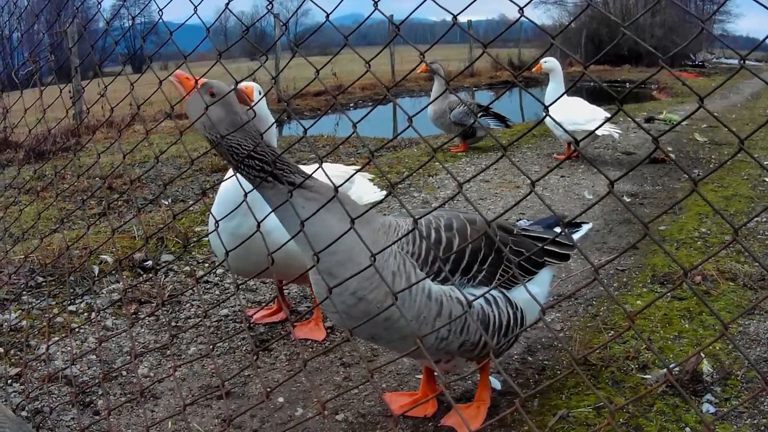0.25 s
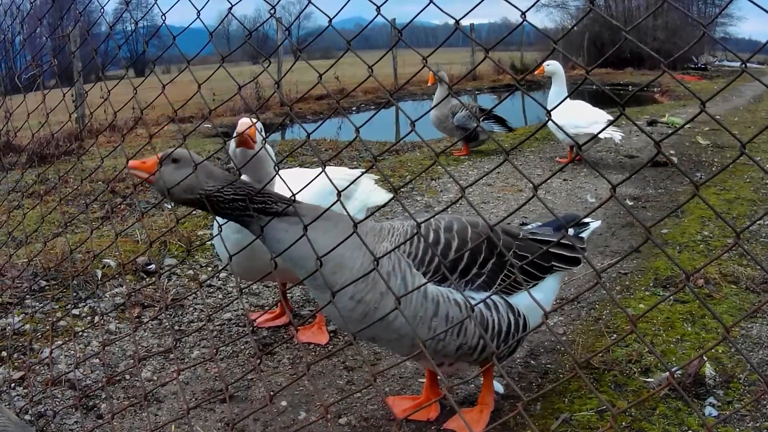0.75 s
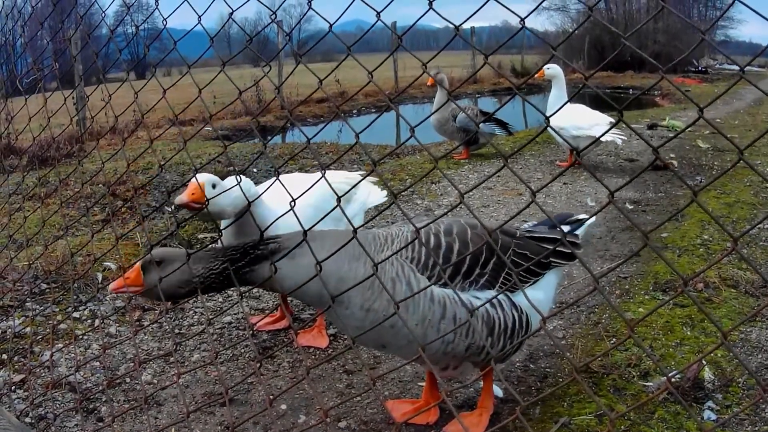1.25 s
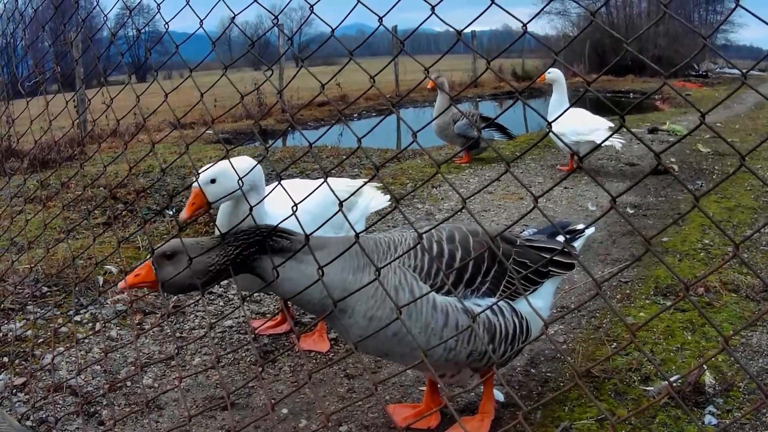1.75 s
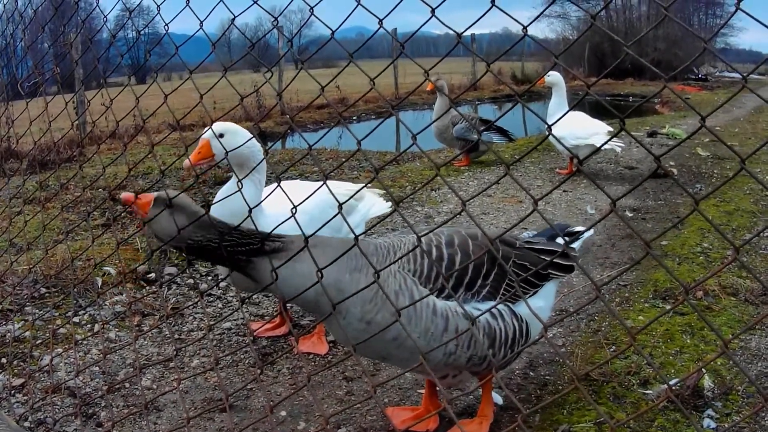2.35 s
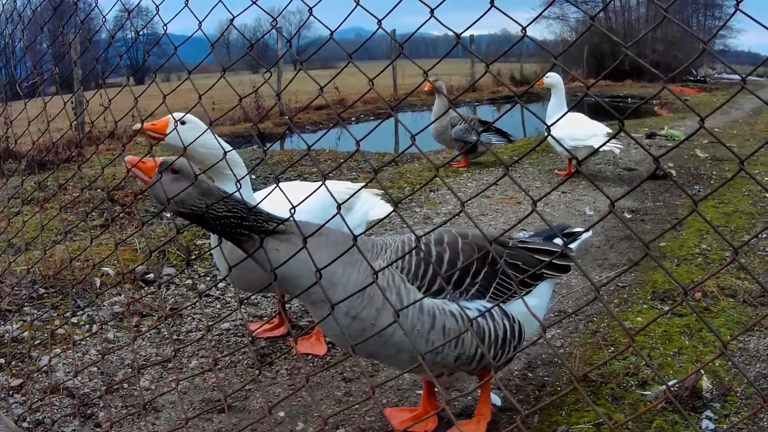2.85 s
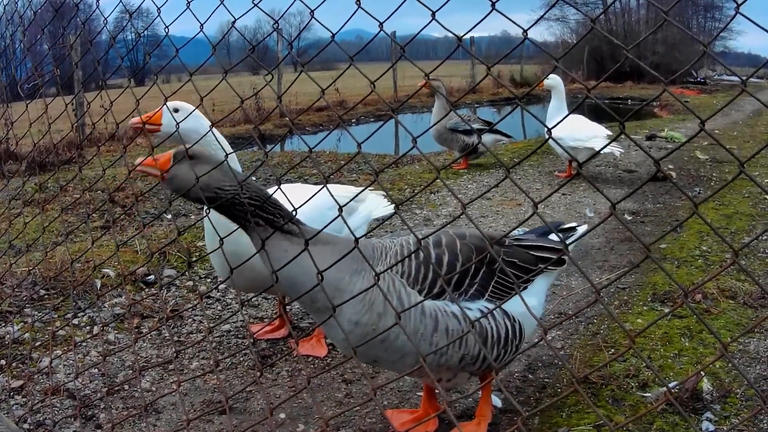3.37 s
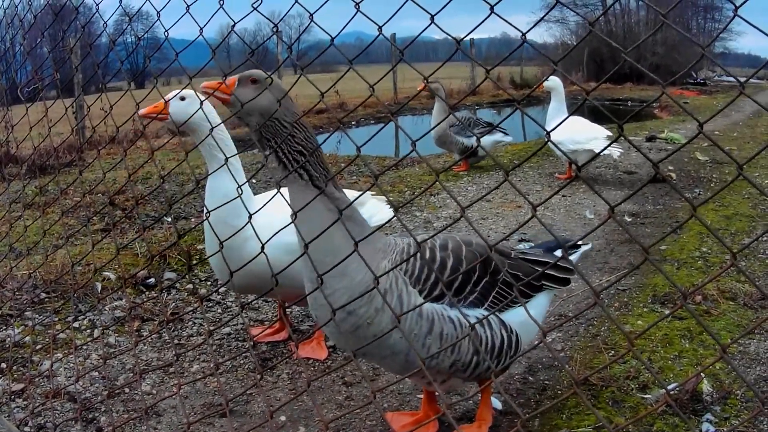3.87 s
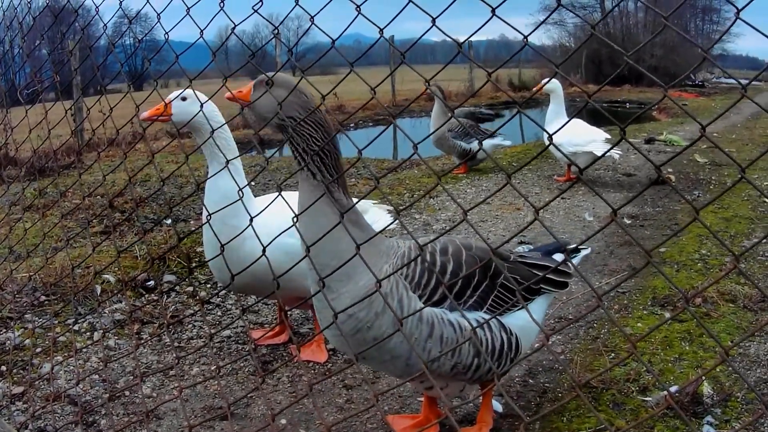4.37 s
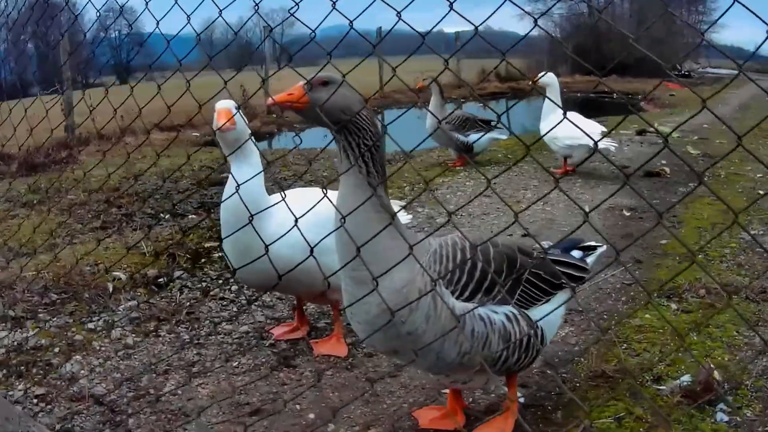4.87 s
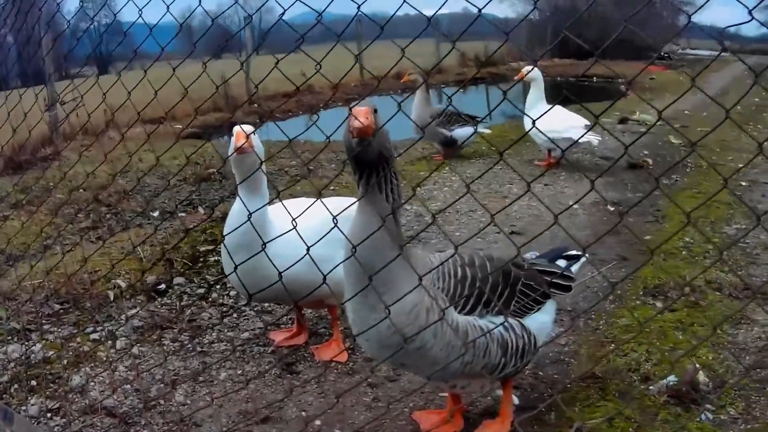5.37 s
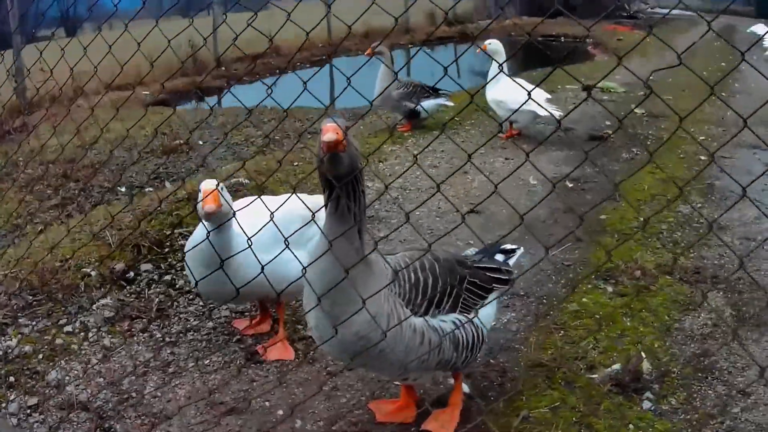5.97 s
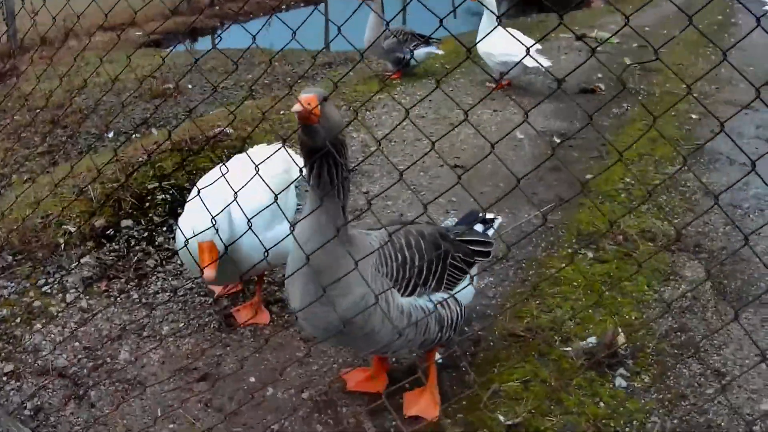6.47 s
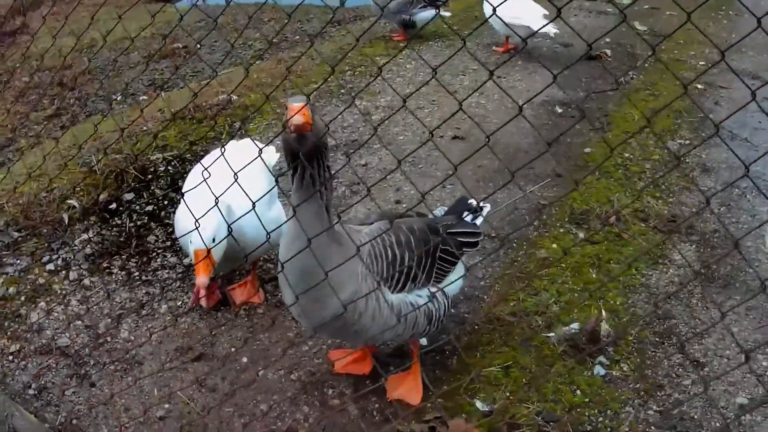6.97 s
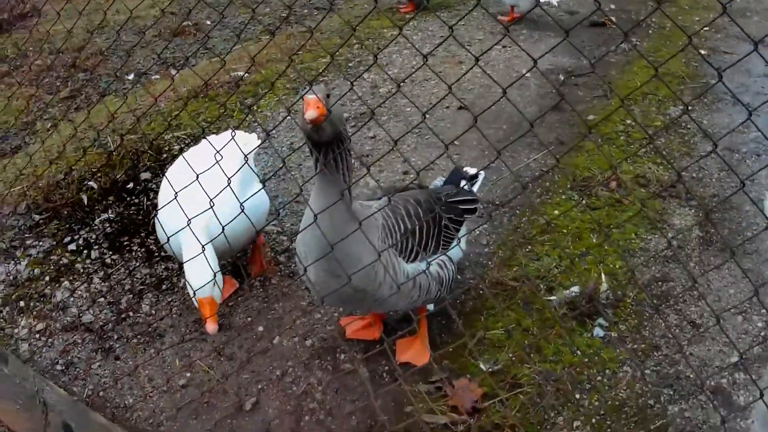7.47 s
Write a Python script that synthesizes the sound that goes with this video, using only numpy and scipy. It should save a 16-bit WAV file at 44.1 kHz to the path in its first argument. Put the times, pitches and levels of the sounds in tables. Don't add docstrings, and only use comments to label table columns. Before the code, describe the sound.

Outdoors in an open yard, geese call very close to a hand-held stereo microphone. From about 0.1 to 1.2 s one cackles in rapid, rough, nasal syllables, about ten a second, in short breaths and rising slightly. A short sharp honk at 1.3 s is surrounded by a mate's low, closed-beak grunts, softening until 1.7 s. After a tiny click at 2.0, a brief honk at 2.2 and a faint falling whistle at 2.4, hoarser chatter runs from 2.5 to 3.5 s. The loudest moment follows: a full brassy honk at 3.65 and a lower answer at 3.9. A small high yelp comes at 4.16. Then it is quiet: faint distant rattles between 4.5 and 6.7, stone ticks at 4.7, 4.9 and 5.4, a sharper snap at 5.9, gravel scuffs and wind bumps near 5.7-6.3. Dull, distant grunts recur from 6.9 to the end at 7.7, with two ticks around 7.1. Hiss rises and falls with calls.

```python
import sys
import numpy as np
from scipy import signal
from scipy.fft import rfft, irfft
from scipy.io import wavfile
from scipy.ndimage import uniform_filter1d

SR = 44100
rng = np.random.default_rng(int(sys.argv[2]) if len(sys.argv) > 2 else 0)


def how_loud(loudness_db):
    steps = np.asarray(loudness_db, float) / 20
    return 10 ** steps


def store_wav(level_fs):
    pcm = np.round(np.clip(np.atleast_2d(level_fs), -1, 1) * 32767)
    wavfile.write(sys.argv[1], SR, pcm.T.astype(np.int16))


N = 340452

# (start [s], beak level [dB], pitch [Hz], windpipe level [dB], upper throat level [dB])
CACKLE = [(.054, -56, 145, -50, -59), (.088,), (.122, -25.5, 156, -33, -43), (.222, -28, 151, -29.5, -40),
          (.316,), (.332, -26, 156, -33, -41), (.418, -23, 158, -30, -38), (.508, -25, 157, -29, -40),
          (.622, -22, 167, -30, -34), (.712, -21, 172, -28, -33), (.815, -23, 172, -29, -34),
          (.92, -26, 170, -26, -33), (1.04,), (1.08, -26, 177, -28, -32), (1.178,)]
CHATTER = [(2.464, -39, 158, -35, -41), (2.535, -34, 171, -29, -43), (2.598,), (2.653, -24, 168, -28, -37),
           (2.755, -29, 162, -29, -38), (2.858, -24, 162, -29, -34), (2.962, -28, 168, -29, -35),
           (2.992, -24, 184, -28, -31), (3.072, -29, 164, -30, -35), (3.158,), (3.176, -25, 185, -29, -28),
           (3.298,), (3.326, -24, 170, -24, -33), (3.42, -32, 178, -28, -35), (3.47, -27, 165, -26, -33),
           (3.546,)]
HONKS = [
    (1.298, -19, 175, -31, -34),
    (1.342,),
    (2.174, -39, 200, -55, -41),
    (2.192, -30, 172, -32, -44),
    (2.222,),
]
YELP = [
    (4.162, -31, 241, -28, -44),
    (4.197,),
]
# (time [s], beak level [dB], pitch [Hz])
BLASTS = [
    [(3.645, -42, 183.4), (3.657, -16, 186.0), (3.664, -10, 186.2), (3.695, -16, 183.0),
     (3.72, -15.5, 183.2), (3.749, -11, 184.2), (3.8, -11, 182.2), (3.829, -22, 174.9), (3.865, -41, 176.0)],
    [(3.872, -42, 170.0), (3.884, -28, 176.0), (3.904, -27, 178.6), (3.914, -14, 180.4),
     (3.922, -12, 180.5), (3.994, -18, 173.3), (4.006, -20, 172.0), (4.038, -41, 168.0)],
]
# (roughness [0-1], beak resonance [Hz])
CACKLE_COLOUR = (.58, 1170)
CHATTER_COLOUR = (.75, 1170)
HONK_COLOUR = (.65, 1090)
YELP_COLOUR = (.4, 1020)
BLAST_COLOUR = (.2, 1125)
# (centre [Hz], width [Hz], level [dB])
WINDPIPE = [(539.3, 285, 6.5), (759.4, 434, 11)]
CACKLE_UPPER = [(1640, 220, -2), (1951, 190, 6), (2320, 200, 0.5), (2939, 610, -11), (3579, 190, -12.5),
                (4130, 580, -23), (5840, 1600, -42.5)]
HONK_UPPER = [(1580, 390, -7), (2330, 220, 4.5), (2797, 313, -6), (3360, 220, -20.5), (3970, 240, -16),
              (5080, 460, -27), (6405, 700, -36)]
# (centre [Hz], width [Hz], level under the windpipe [dB])
MATE_CHEST = [(127, 13, -16.5), (256.3, 180, -15.5)]
# (start [s], length [s], level [dB], pitch [Hz])
GRUNTS = [
    (1.19, .085, -34.5, 126),
    (1.39, .11, -39.5, 125),
    (1.616, .095, -44, 119.9),
    (6.929, .095, -46.5, 120.7),
    (7.19, .115, -49.5, 124.3),
    (7.457, .13, -49.5, 126),
    (7.701, .03, -59.5, 123),
]
# (frequency [Hz], level [dB])
GRUNT_NEAR = [(90, -11.5), (125, -4.5), (260, -5), (360, -12.5), (500, -4), (660, 4), (900, -12),
              (1500, -10), (2400, -19), (3500, -41), (6000, -66)]
GRUNT_AWAY = [(90, -10), (125, 12.5), (250, 8.5), (370, 4), (500, 7), (1020, 14), (1250, 3), (1550, 3.5),
              (1900, -21), (3500, -42.5)]
# (start [s], length [s], upper band level [dB], lower band relative [dB])
FAR = [
    (4.459, .17, -59, -36),
    (5.112, .07, -68, -18),
    (5.278, 0.11, -68, -10.5),
    (5.873, .08, -53, 1.5),
    (6.147, .09, -54.5, -1),
    (6.383, .09, -58, 2.5),
    (6.634, .08, -60, 5),
]
# (centre [Hz], width [Hz])
FAR_BANDS = [(1079, 140), (568, 148)]
# (time [s], pitch [Hz], level [dB])
PEEP = [
    (2.37, 820, -74.5),
    (2.42, 653, -41.5),
    (2.45, 650, -72),
]
# (time [s], peak level [dB], low ring [Hz], high ring relative [dB], t60 [s])
TICKS = [
    (4.741, -48, 804, -11.5, 0.093),
    (4.94, -42, 1120, -18, 0.027),
    (5.386, -40.5, 290, -21, 0.085),
    (5.387, -38.5, 696, -15.5, .05),
    (7.068, -40.5, 636, -10.5, 0.026),
    (7.115, -47, 316, -22, 0.026),
]
SNAP = [
    (2.002, -54, 3330, -41.5, .008),
    (5.69, -65, 325, 3, 0.048),
    (5.766, -52.5, 380, 2, 0.059),
    (5.934, -33.5, 590, -9.5, 0.049),
    (6.059, -63.5, 271, 7.5, 0.015),
]
# (time [s], level [dB])
SCUFF = [
    [(5.66, -100.5), (5.768, -65.5), (6.6, -97)],
    [(6.91, -83), (6.955, -60.5), (7.16, -77)],
]
# (time [s], level [dB])
GUSTS = [(0.0, -70), (0.36, -56), (1.7, -61), (1.83, -76.5), (2.66, -60.5), (5.29, -57), (5.63, -46.5),
         (6.23, -46), (6.53, -56.5), (7.42, -57), (7.5, -46), (7.72, -59)]
# (time [s], level [dB])
YARD_WASH = [
    [(0.0, -68.5), (0.11, -58), (0.14, -57.5)],
    [(4.1, -57), (4.25, -66), (5.16, -77.5), (7.28, -72), (7.72, -72.5)],
]
# (frequency [Hz], level [dB])
WIND = [(8.8, -29), (15, 3.5), (40, -4.5), (85, -13), (136, -28.5), (220, -38.5), (290, -65.5), (480, -120)]
WASH = [(150, 3), (330, -11.5), (560, -7), (900, -9), (1200, -2), (1550, -20.5), (2100, -13.5),
        (3000, -26.5), (6000, -39)]
GRIT = [(1000, -17), (1600, -7), (2000, 0.5), (2600, -16), (4000, -26), (7000, -27.5)]
HISS = [(200, -25.5), (3000, -17), (5500, -16), (7200, -24), (8200, -10.5), (9300, -1), (10500, -6),
        (11800, -16), (12600, -31.5), (14000, -40.5)]
# (frequency [Hz], t60 [s])
YARD = [(150, 0.15), (600, 0.26), (1200, 0.3), (3000, 0.35), (7000, 0.13)]
# (frequency [Hz], phase [rad])
LEAD = [(60, .2), (200, .6), (400, .35), (700, -.25), (1500, -.2), (3900, 0)]
# (frequency [Hz], level [dB])
LEAN = [(60, 0), (95, -1), (150, -0.5), (240, 1.5), (380, 2), (590, 0.5), (940, 1), (1480, 0.5),
        (2350, 0.5), (3710, 2)]
# (from [s], to [s])
DROPOUTS = [(1.285, 1.34), (2.465, 2.49), (2.655, 2.678), (3.325, 3.345), (3.645, 3.668), (4.165, 4.185)]

RISE_S, FALL_S, EDGE_DB = 0.013, 0.017, 25.5
BEAK_ARCH_DB, UPPER_ARCH_DB, PIPE_ARCH_DB, PITCH_ARCH, CREST = 12, 4.5, 3, .072, .52
SLUR_S = .011
TONGUE_DB = 3
CHEST_DB, YELP_CHEST_DB = -7.5, -30
BLAST_PIPE_DB, BLAST_UPPER_DB, BLAST_CHEST_DB = -25, -14, -12.5
MATE_HZ, GRUNT_ARCH_DB = 121.7, 5
FAR_PER_S, FAR_ARCH_DB = 97, 8
TICK_HZ, SNAP_HZ = 1540, 2180
YARD_DB, FAR_YARD_DB, SCATTER_DB = -20, -12.5, -13
GATE_SHUT_DB, GATE_OPEN_DB, HISS_DB, GATE_DEPTH_DB = -83.5, -51.5, -62.5, 36


def goose(shape, colour, upper, mate):
    beak_db, hz, pipe_db, upper_db, chest_db = shape
    rough, beak_hz = colour
    count, bend = len(hz), hz / hz.mean()
    slack_db = np.minimum(beak_db.max() - beak_db, 14)
    drive, turns = syrinx(hz, .75 * rough + .012 * slack_db, jitter=.02)

    gabble = syrinx(MATE_HZ + 0 * hz, .4 + 0 * hz, jitter=0.17, top_hz=1500)[0]
    crowd = mate * how_loud(np.minimum(pipe_db, 6))
    pipe = 0
    for k, (f, width, db) in enumerate(WINDPIPE):
        pipe = pipe + (-1) ** k * how_loud(db) * steep(drive + crowd * gabble, f, width)
    mate_chest = sum(how_loud(db) * evened(resonate(gabble, f, width)) for f, width, db in MATE_CHEST)
    pipe = evened(pipe, size=700) + np.minimum(crowd, .4) * mate_chest

    raspy = drive + (.22 + .7 * rough) * rush(count)
    throat = 0
    for k, (f, width, db) in enumerate(upper):
        tongue_db = TONGUE_DB * evened(uniform_filter1d(rush(count), size=2200))
        throat = throat + (-1) ** k * how_loud(db + tongue_db) * resonate(raspy, f * bend ** 0.71, width)

    chest = np.sqrt(2) * np.cos(2 * np.pi * turns)
    beak = evened(steep(drive, beak_hz * bend ** 0.18, 280), size=700)
    body = how_loud(pipe_db) * pipe + how_loud(upper_db) * evened(throat, size=700) + how_loud(chest_db) * chest
    return how_loud(beak_db) * (beak + body)


def syrinx(hz, rough, jitter, top_hz=7000):
    wobble = evened(uniform_filter1d(rush(len(hz)), size=260))
    turns = np.cumsum(hz * (1 + jitter * rough * wobble)) / SR
    pulses = sum(np.cos(2 * np.pi * k * turns) for k in range(1, int(top_hz / hz.max())))
    puffs = (.25 + np.exp(-(turns % 1) / 0.75)) * rush(len(hz))
    share = np.clip(rough, 0, 1)
    return np.sqrt(1 - share ** 2) * evened(pulses) + share * evened(puffs), turns


def syllables(rows, stop, chest_db):
    starts = np.append(rows[:, 0], stop)
    edge_db, u = breath(stop - starts[0])
    t = starts[0] + u * (stop - starts[0])
    k = np.clip(np.searchsorted(starts, t, side="right") - 1, 0, len(rows) - 1)
    off = arch((t - starts[k]) / np.diff(starts)[k])
    slur = int(SLUR_S * SR)
    beak_db, hz, pipe_db, upper_db = uniform_filter1d(rows[k, 1:], size=slur, axis=0).T
    beak_db = beak_db - BEAK_ARCH_DB * off
    pipe_db = pipe_db - PIPE_ARCH_DB * off
    upper_db = upper_db - UPPER_ARCH_DB * off
    chest_db = pipe_db + chest_db - 8.0 * off
    hz = uniform_filter1d(hz * (1 - PITCH_ARCH * off), size=slur)
    return beak_db + edge_db, hz, pipe_db - beak_db, upper_db - beak_db, chest_db - beak_db


def blast(rows):
    beak_db, hz = played(rows)
    pipe_db = np.minimum(BLAST_PIPE_DB - beak_db, 1.5)
    upper_db = BLAST_UPPER_DB + .25 * (pipe_db - pipe_db.min())
    return beak_db, hz, pipe_db, upper_db, pipe_db + BLAST_CHEST_DB


def phrases(table):
    stops = [k for k, row in enumerate(table) if len(row) == 1]
    return [(np.array(table[a + 1:b]), table[b][0]) for a, b in zip([-1] + stops, stops)]


def breath(length):
    t = np.arange(0, length + FALL_S, 1 / SR)
    edges = np.clip(1 - t / RISE_S, 0, 1) + np.clip((t - length) / FALL_S, 0, 1)
    return -EDGE_DB * edges, t / length


def arch(u):
    return np.minimum(np.where(u < CREST, 1 - u / CREST, (u - CREST) / (1 - CREST)), 1.2) ** 2


def grunt(length, peak_db, top_hz, colour):
    edge_db, u = breath(length)
    off = arch(u)
    drive = syrinx(top_hz * (1 - PITCH_ARCH * off), .7 + 0 * u, jitter=0.11, top_hz=5200)[0]
    voice = evened(coloured(drive, colour), size=1200)
    smear = rush(300) * np.exp(-np.arange(300) / 130)
    smear_phase = np.angle(rfft(smear, len(u)))
    voice = irfft(rfft(voice) * np.exp(1j * smear_phase), len(u))
    dull = uniform_filter1d(voice, size=30)
    return how_loud(peak_db + edge_db - GRUNT_ARCH_DB * off) * (dull + (voice - dull) * how_loud(-9 * off))


def far_call(length, peak_db, lower_db):
    edge_db, u = breath(length)
    upper_db = peak_db + edge_db - FAR_ARCH_DB * arch(u)
    drive = syrinx(FAR_PER_S + 0 * u, .65 + 0 * u, jitter=.25, top_hz=1600)[0]
    drive = drive * how_loud(4.2 * evened(uniform_filter1d(rush(len(u)), size=500)))
    lift = np.linspace(.92, 1.07, len(u))
    upper, lower = (evened(resonate(drive, f * lift, width), size=2500) for f, width in FAR_BANDS)
    return how_loud(upper_db) * (upper + how_loud(lower_db) * lower)


def peep():
    hz, level_db = uniform_filter1d(played(PEEP), size=700, axis=1)
    return np.sqrt(2) * how_loud(level_db) * np.sin(2 * np.pi * np.cumsum(hz) / SR)


def tick(peak_db, low_hz, high_db, t60, high_hz):
    t = np.arange(-100, 2000) / SR
    knock = rng.standard_normal(len(t)) * how_loud(-60 * np.maximum(t, 0) / t60) * (t > 0)
    low = resonate(knock, low_hz, 0.43 * low_hz)
    high = resonate(knock, high_hz, 0.23 * high_hz)
    return how_loud(peak_db) * (low / abs(low).max() + how_loud(high_db) * high / abs(high).max())


def air():
    wind = along(GUSTS) * noise(WIND, 0.99, 1.4, size=1500)
    wash = sum(along(rows) for rows in YARD_WASH) * noise(WASH, 0.73, 0.78, size=2500)
    scuff = sum(along(rows) for rows in SCUFF) * noise(GRIT, 0.93, 3.3, size=700)
    return wind + wash + scuff


def yard(x):
    taps = np.zeros((2, SR))
    at = np.arange(500, SR - 20, 20) + rng.integers(0, 20, (SR - 501) // 20)
    taps[:, at] = rng.choice([-1., 1.], len(at)) + 0.38 * rng.standard_normal((2, len(at)))
    hz, t, z = signal.stft(taps, SR, nperseg=256)
    tail = signal.istft(z * how_loud(-60 * t / read(YARD, hz)[:, None]), SR, nperseg=256)[1]
    return signal.fftconvolve(x[None], tail / np.linalg.norm(tail[0]), axes=1)[:, :N]


def ports(x):
    hz = np.fft.rfftfreq(N, 1 / SR)
    half = np.exp(.5j * read(LEAD, hz)) * how_loud(.5 * read(LEAN, hz))
    scatter = rng.standard_normal(600) * np.exp(-np.arange(600) / 150)
    scatter = rfft(scatter / np.linalg.norm(scatter), N).real
    side = how_loud(SCATTER_DB) * 1j * scatter * np.clip(hz / 500, 0, 1) / (1 + hz / 5000)
    return np.array([irfft(rfft(x) * (half + side), N), irfft(rfft(x) * (1 / half - side), N)])


def gated_hiss(dry):
    bright = signal.sosfilt(signal.butter(4, 1900, "high", fs=SR, output="sos"), dry.mean(0))
    level_db = 10 * np.log10(abs(uniform_filter1d(bright ** 2, size=800, origin=399)) + 1e-12)
    opening = np.clip((level_db - GATE_SHUT_DB) / (GATE_OPEN_DB - GATE_SHUT_DB), 0, 1)
    t = np.arange(N) / SR
    fall = 5.0 * t
    held = np.maximum.accumulate(opening + fall) - fall
    smooth = uniform_filter1d(held, size=1200, origin=599)
    ducked = uniform_filter1d(sum((t > a) * (t < b) * 1. for a, b in DROPOUTS), size=100)
    return how_loud(HISS_DB - GATE_DEPTH_DB * (1 - smooth) - 22 * ducked) * noise(HISS, 0.99, 0.51, size=600)


def noise(colour, same, lumps_db, size):
    a, b, lumps = rng.standard_normal((3, N))
    pair = np.array([coloured(a + np.sqrt(1 - same) * side * b, colour) for side in (1, -1)])
    drift = evened(uniform_filter1d(uniform_filter1d(lumps, size), size))
    return evened(pair) * how_loud(lumps_db * drift)


def rush(count):
    return rng.standard_normal(count)


def resonate(x, hz, width):
    turn = np.exp(2j * np.pi * np.cumsum(hz * np.ones(len(x))) / SR)
    r = np.exp(-np.pi * width / SR)
    return 2 * (turn * signal.lfilter([(1 - r) ** 2], [1, -2 * r, r * r], x / turn)).real


def steep(x, hz, width):
    return resonate(resonate(x, hz, width), hz, width)


def coloured(x, points):
    return irfft(rfft(x) * how_loud(read(points, np.fft.rfftfreq(len(x), 1 / SR))), len(x))


def evened(x, size=None):
    power = abs(uniform_filter1d(x ** 2, size)) if size else np.mean(x ** 2)
    return x / np.sqrt(power + 1e-20)


def read(points, hz):
    f, value = np.transpose(points)
    return np.interp(np.log(hz + 1), np.log(f + 1), value)


def played(rows):
    s, *columns = np.transpose(rows)
    t = np.arange(s[0], s[-1], 1 / SR)
    return [np.interp(t, s, c) for c in columns]


def along(rows):
    return how_loud(np.interp(np.arange(N) / SR, *np.transpose(rows), left=-150, right=-150))


def add(mix, s, sound):
    part = mix[round(s * SR):][:len(sound)]
    part += (sound * signal.windows.tukey(len(sound), 200 / len(sound)))[:len(part)]


def scene():
    near, far = np.zeros((2, N))
    bouts = [(CACKLE, CACKLE_COLOUR, CHEST_DB), (CHATTER, CHATTER_COLOUR, CHEST_DB),
             (HONKS, HONK_COLOUR, CHEST_DB), (YELP, YELP_COLOUR, YELP_CHEST_DB)]
    for table, colour, chest_db in bouts:
        for rows, stop in phrases(table):
            add(near, rows[0, 0], goose(syllables(rows, stop, chest_db), colour, CACKLE_UPPER, mate=0.23))
    for rows in BLASTS:
        add(near, rows[0][0], goose(blast(rows), BLAST_COLOUR, HONK_UPPER, mate=.2))
    for s, *row in GRUNTS:
        add(near, s, grunt(*row, GRUNT_NEAR if s < 3 else GRUNT_AWAY))
    for s, *row in FAR:
        add(far, s, far_call(*row))
    add(near, PEEP[0][0], peep())
    for rows, high_hz in (TICKS, TICK_HZ), (SNAP, SNAP_HZ):
        for s, *blow in rows:
            add(far, s - 100 / SR, tick(*blow, high_hz))
    return ports(near + far) + yard(how_loud(YARD_DB) * near + how_loud(FAR_YARD_DB) * far) + air()


def band_limit(x):
    return signal.sosfilt(signal.butter(12, 15300, fs=SR, output="sos"), x)


def record(dry):
    mix = dry + gated_hiss(dry)
    return band_limit(mix)


dry = scene()
out = record(dry)
store_wav(out)
```